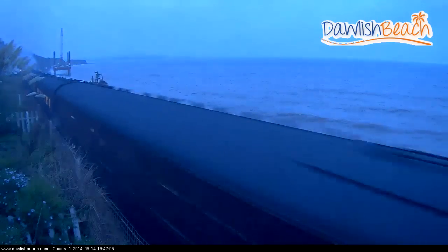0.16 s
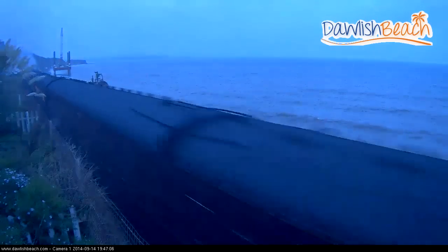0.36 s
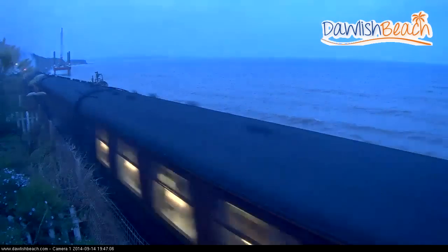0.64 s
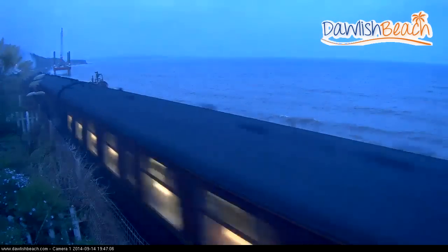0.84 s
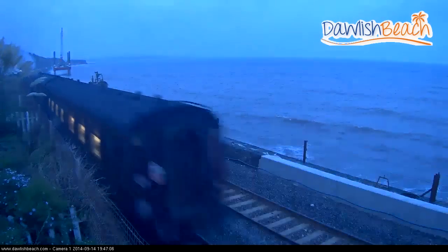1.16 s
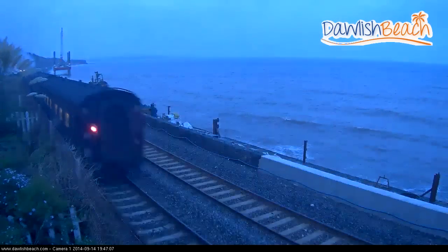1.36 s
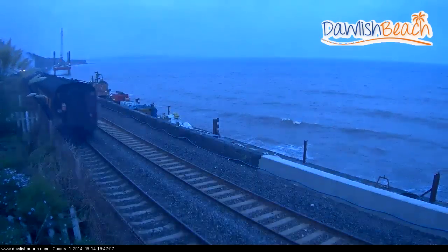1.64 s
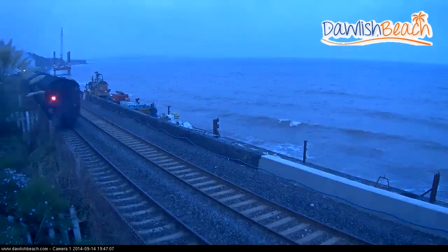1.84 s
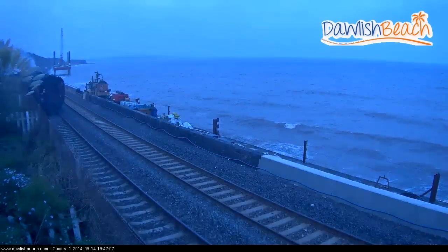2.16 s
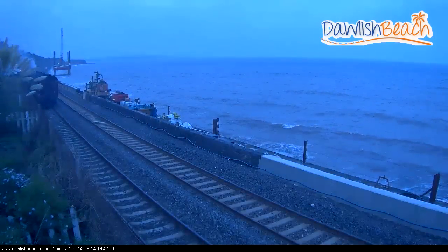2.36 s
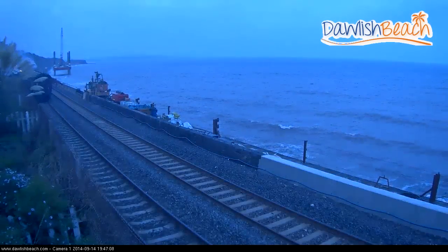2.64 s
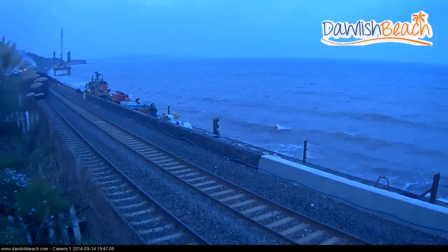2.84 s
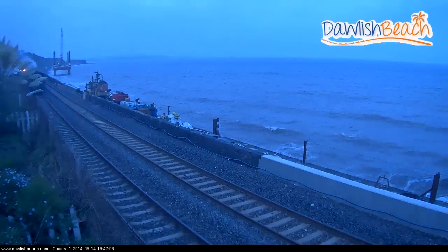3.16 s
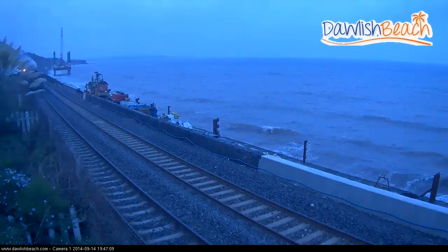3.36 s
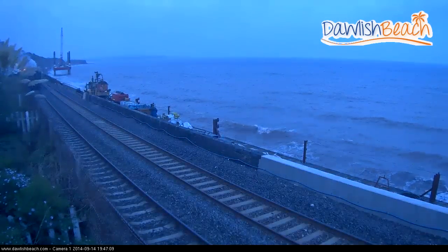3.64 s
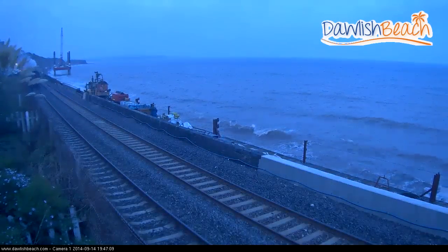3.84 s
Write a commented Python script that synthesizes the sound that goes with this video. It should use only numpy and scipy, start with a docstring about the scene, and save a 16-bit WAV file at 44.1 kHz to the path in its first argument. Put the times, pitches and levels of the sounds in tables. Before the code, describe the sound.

Train coaches roar past very close, distorted and rattling, then recede into a low fading roll.

```python
"""The last coaches of a train roll past a cheap outdoor microphone and draw away along a sea wall.
At first shaped noise roars, rumbles and rattles, with short noise ticks and singing rails (fuzzy tones).
The roar overloads the input stage lopsidedly. After about a second the train sinks away.
Then short dull rings sound in the fading roll, while a faint whine fades and noise makes gusts of wind.
Near the end the soft hiss of the surf, also shaped noise, swells again."""
import sys
import numpy as np
from scipy import signal
from scipy.io import wavfile
from scipy.ndimage import uniform_filter1d

SR = 44100
rng = np.random.default_rng(int(sys.argv[2]) if len(sys.argv) > 2 else 0)


def to_wav(s):
    """Save 16-bit WAV."""
    ch = np.atleast_2d(s).T  # columns
    pcm = np.round(np.clip(ch, -1, 1) * 32767)  # PCM
    wavfile.write(sys.argv[1], SR, pcm.astype(np.int16))


def linear_from_db(decibels):
    """Turn decibels (scalar or array-like) into linear amplitude factors; 0 gives 1."""
    return 10 ** (np.asarray(decibels, float) / 20)


N = 176400  # samples, 4 s

# Colours give only the balance between pitches; each sound's level is set apart from its colour.
# hiss of the surf: t/s, level/dB
SURF_LEVEL = [(1.5, -58.5), (2.25, -63.5), (3.0, -68), (3.5, -68), (3.75, -63.5), (4.0, -62.5)]
# colour of the surf: f/Hz, level/dB per Hz
SURF_SPECTRUM = [(1760, -23), (3000, -2.5), (4750, -0.5), (5410, -4.5), (6510, -5), (8000, -10.5),
                 (10100, -9.5), (13200, -16.5), (15500, -28)]
# wind on the microphone housing: t/s, level/dB
WIND_LEVEL = [(0, -40), (1.3, -43), (1.5, -54), (1.8, -46), (1.95, -41), (2.3, -42), (2.55, -49),
              (2.85, -40), (3.2, -48.5), (3.7, -52), (3.8, -43), (4, -48)]
# high whine of the leaving train: f/Hz, width/Hz, level at 1.5 s/dB, fall/dB per s
WHINE_BANDS = [(8630, 650, -69.5, 10), (6650, 300, -81.5, 0.5), (11700, 300, -85, 0.5)]
# deep rumble of the coach bodies alongside, then of the sea: t/s, level/dB
RUMBLE_LEVEL = [(0, -16.5), (.6, -20.5), (1.15, -25.5), (1.36, -28.5), (1.43, -48), (2, -49), (2.6, -42),
                (3.3, -46), (4, -42.5)]
# colour of the rumble: f/Hz, level/dB per Hz
RUMBLE_SPECTRUM = [(30, -7.5), (60, -7.5), (130, -3), (200, 1.5), (380, 2.5), (520, 9.5), (1000, -41),
                   (16000, -120)]
# rattle of the coaches: t/s, level/dB
RATTLE_LEVEL = [(0, -26.5), (.2, -26), (.4, -24), (.47, -33), (.6, -31), (.8, -30.5), (.97, -26),
                (1.05, -31), (1.13, -32), (1.25, -39), (1.4, -45.5), (1.6, -53), (2.0, -55), (2.6, -53),
                (4, -77)]
# colour of the rattle: f/Hz, level/dB per Hz
RATTLE_SPECTRUM = [(800, -38), (1500, 9.5), (3000, -9.5), (6000, -20), (11000, -29), (16000, -41)]
# sharp ticks of metal on metal: t/s, level at the start of the decay/dB
TICK_HITS = [(0.0653, -28), (0.0902, -30), (0.150, -26), (0.1855, -29), (0.214, -33), (0.301, -32),
             (0.321, -30), (0.372, -37), (0.398, -29), (0.4604, -38), (0.526, -32), (0.6045, -32),
             (0.668, -31), (0.7195, -28), (0.778, -40), (0.853, -32), (0.984, -32), (1.054, -37),
             (1.089, -33), (1.168, -41), (1.222, -42.5), (1.249, -50), (1.274, -45), (1.331, -46)]
# short dull rings near 700 Hz within the fading roll:
# t/s, level before rise, decay and doubling/dB, ring f/Hz
DULL_RINGS = [(1.868, -11, 686), (1.943, -17, 680), (1.978, -17, 730), (1.996, -16, 705), (2.066, -18, 720),
              (2.186, -16.5, 710), (2.612, -25, 730), (2.665, -19, 737), (2.718, -19, 770),
              (3.397, -24, 700)]
# rolling noise before the overload: t/s, level/dB, tilt/dB per doubling of (1 + f/700 Hz), hump f/Hz
PASSING = [(0, -10, -3, 764), (.15, -10, 4.5, 743), (.3, -10, 10, 724), (.45, -9.5, 13, 646),
           (.6, -10.5, 8.5, 720), (.75, -10, 10.5, 642), (.87, -11, 8.5, 750), (1.0, -11, 13, 628),
           (1.119, -10.5, -6.5, 724), (1.25, -15, -2.5, 710), (1.4, -20, 3, 624), (1.65, -20.5, -0.5, 663),
           (1.95, -26, 1, 653), (2.3, -28.5, 0, 668), (2.55, -30.5, -1.5, 708), (3.0, -31, 0, 670),
           (3.3, -31, -0.5, 684), (3.5, -32.5, 3, 667), (3.65, -31, 1.5, 652), (3.85, -30, 3, 649),
           (4.0, -33, 5.5, 686)]
# colour of wheels and rails with the hump at 700 Hz: f/Hz, level/dB per Hz
ROLLING_SPECTRUM = [(20, -40), (100, -26), (200, -19.5), (290, -22), (340, -13.5), (400, -14.5),
                    (470, -5.5), (600, -1.5), (730, 0), (850, -3.5), (1000, -11.5), (1200, -16.5),
                    (1400, -16.5), (1600, -36), (2100, -30), (2700, -42.5), (4000, -55), (16000, -78)]
# three resonances of wheel and rail, two gliding and one steady, before their lift: width/Hz, level/dB
# (level against the rolling noise)
RAIL_RESONANCES = [(56, -21), (35, -9), (47, -33.5)]
# singing of the rails, added to the resonance levels: t/s, then the lift of each of the three/dB
SINGING_LIFT = [(0, 8.5, 2, 10), (.3, 7.5, 2.5, 7), (.55, 1, 2.5, 2), (.8, 3, -1.5, -4), (1.0, 8.5, 2, 5),
                (1.2, -1, 3, -3), (1.4, -4, -6, -4.5), (2.0, -7, 1, 3), (2.15, 5, 1, 6), (2.3, -3, 5, 11),
                (2.5, 3, 0, 3), (2.62, 7.5, -2.5, 8), (2.78, -3, 0, 1), (2.93, -2, 0, 6),
                (3.05, -1.5, -9, 2), (4, -7, -3, -4)]
# pitch of the gliding resonances as the bogies go by: t/s, upper f/Hz, lower f/Hz
PITCH_GLIDE = [(0, 1419, 843), (.17, 1418, 813.6), (.25, 1313, 788), (.38, 1350, 790), (.46, 1350, 654),
               (.58, 1346, 637), (.66, 1363, 784), (0.859, 1334, 843), (0.931, 1290, 668),
               (1.059, 1280, 595), (1.139, 1312, 766), (1.25, 1335, 684), (1.4, 1298, 696),
               (2.0, 1373, 715), (4, 1375, 724)]


def evened(x):
    """Scales a sound to rms 1, so that its level can be set afterwards."""
    return x / np.sqrt(np.mean(x ** 2) + 1e-20)


def read(points, hz):
    """Reads a colour table at any pitch, along a logarithmic pitch axis."""
    f, value = np.transpose(points)
    return np.interp(np.log(hz + 1), np.log(f + 1), value)


def along(curve):
    """Turns a table of times and dB levels into a gain for every sample."""
    s, db = np.transpose(curve)
    return linear_from_db(np.interp(np.arange(N) / SR, s, db))


def drift(rate_hz):
    """Random wavering of rms 1: sines from a tenth of the rate up to the rate, slow ones strongest."""
    t = np.arange(N) / SR
    waves = [np.sin(2 * np.pi * (f * t + rng.random())) / np.sqrt(f)
             for f in np.geomspace(rate_hz / 10, rate_hz, 20)]
    return evened(sum(waves))


def noise(field_db, patchy_db, size=1024):
    """Noise of rms 1 from random short spectra coloured by field_db(Hz, s), with drifting patches."""
    frames = N * 4 // size + 5
    hz = np.fft.rfftfreq(size, 1 / SR)[:, None]
    a, b, patches = rng.standard_normal((frames, len(hz), 3)).T
    patches = uniform_filter1d(patches, size=8, axis=0)
    patches = evened(uniform_filter1d(patches, size=10, axis=1))
    frame_s = np.arange(frames) * size / 4 / SR
    shape = linear_from_db(field_db(hz, frame_s) + 0 * a)
    shape = shape / np.sqrt((shape ** 2).mean(0))  # equally strong frames, before the patches
    spectra = (a + 1j * b) * shape * linear_from_db(patchy_db * patches)
    sound = signal.istft(spectra, nperseg=size, noverlap=size * 3 // 4)[1]
    return evened(sound[:N])


def fuzzy_tone(hz, width):
    """Noise of rms 1 through a doubled narrow resonance, whose pitch may stay or glide."""
    turn = np.exp(2j * np.pi * np.cumsum(hz * np.ones(N)) / SR)
    r = np.exp(-np.pi * width / SR)
    # filter around zero pitch, then turn the result up to the wanted pitch
    low = signal.lfilter([1], np.convolve([1, -r], [1, -r]), rng.standard_normal(N) / turn)
    return evened((turn * low).real)


def add(mix, s, sound):
    """Mixes a sound in at time s, cut off at the end of the mix."""
    part = mix[round(s * SR):][:len(sound)]
    part += sound[:len(part)]


def surf():
    """Smooth wide hiss of shaped noise, swelling as a wave runs in."""
    hiss = noise(lambda hz, t: read(SURF_SPECTRUM, hz), patchy_db=-0.2, size=512)
    return along(SURF_LEVEL) * linear_from_db(0.27 * drift(8.9)) * hiss


def wind():
    """Lumpy low buffeting of air on the housing, with ever less power above a low corner."""
    corner_hz, slope_db = 49, 15  # slope: dB per doubling of (1 + (f/corner)^2)
    low = noise(lambda hz, t: -slope_db * np.log2(1 + (hz / corner_hz) ** 2), patchy_db=1.2, size=4096)
    return along(WIND_LEVEL) * linear_from_db(1.7 * drift(1.5)) * low


def whine():
    """Broad high bands of resonant noise, fading steadily as the train leaves."""
    t = np.arange(N) / SR - 1.5
    return sum(linear_from_db(db - fall * t) * fuzzy_tone(hz, width) for hz, width, db, fall in WHINE_BANDS)


def rumble():
    """Low noise of the coach bodies that drops to the wash of the sea once the last coach has gone by."""
    low = noise(lambda hz, t: read(RUMBLE_SPECTRUM, hz), patchy_db=2.65, size=2048)
    return along(RUMBLE_LEVEL) * low


def rattle():
    """Bright clatter of the coaches: noise whose level flickers in quick bursts."""
    clatter = noise(lambda hz, t: read(RATTLE_SPECTRUM, hz), patchy_db=2.5, size=256)
    return along(RATTLE_LEVEL) * linear_from_db(0.5 * drift(62.5)) * clatter


def ticks():
    """Bright ticks from the couplings: puffs of band-limited noise that die away at once."""
    t60_s, low_hz, high_hz = 0.018, 1500, 4000  # t60: time to fall by 60 dB
    out, t = np.zeros(N), np.arange(3000) / SR
    band = signal.butter(1, [low_hz, high_hz], "band", fs=SR)
    puffs = signal.lfilter(*band, rng.standard_normal((len(TICK_HITS), len(t))))
    for (s, db), puff in zip(TICK_HITS, puffs):
        add(out, s, linear_from_db(db - 60 * t / t60_s) * evened(puff))
    return out


def dull_rings():
    """Short dull rings in the fading roll: sines that rise softly and die away quickly."""
    rise_s, t60_s = 0.003, 0.031  # t60: time to fall by 60 dB
    out, t = np.zeros(N), np.arange(3000) / SR
    for s, db, hz in DULL_RINGS:
        envelope = linear_from_db(db - 60 * t / t60_s) * (1 - np.exp(-t / rise_s))
        add(out, s, envelope * 2 * np.sin(2 * np.pi * hz * t))
    return out


def rail_singing():
    """Wheel and rail resonances: two fuzzy tones with gliding pitch and one steady one."""
    steady_hz = 1980
    at, *lifts = np.transpose(SINGING_LIFT)
    when, *pitches = np.transpose(PITCH_GLIDE)
    pitches.append(steady_hz + 0 * when)
    out = np.zeros(N)
    for lift, pitch, (width, db) in zip(lifts, pitches, RAIL_RESONANCES):
        hz = np.interp(np.arange(N) / SR, when, pitch)
        out += along(np.c_[at, lift]) * linear_from_db(db) * fuzzy_tone(hz, width)
    return out


def rolling():
    """Wheel and rail roar: noise whose hump wanders from bogie to bogie and whose brightness shifts."""
    hump_hz = 700  # hump of the colour table
    s, db, tilt, hump = np.transpose(PASSING)

    def colour(hz, t):
        """Stretches the colour so that its hump moves, then tilts it."""
        base = read(ROLLING_SPECTRUM, hz * hump_hz / np.interp(t, s, hump))
        return base + np.interp(t, s, tilt) * np.log2(1 + np.minimum(hz / hump_hz, 4))

    roar = linear_from_db(0.33 * drift(20)) * noise(colour, patchy_db=0.73)
    return along(np.c_[s, db]) * (roar + rail_singing())


def scene():
    """Adds up all sources at one microphone."""
    background = surf() + wind() + whine()
    train = rumble() + rattle() + ticks() + dull_rings() + rolling()
    return (background + train)[None]


def top_cut(x):
    """Nothing passes above the cut-off."""
    return signal.sosfilt(signal.butter(12, 15610, fs=SR, output="sos"), x)


def record(dry):
    """An off-centre input stage flattens upper half-waves first; a coupling capacitor removes the offset."""
    bias, clean_share = 0.59, 0.08
    ceiling, coupling_hz = 0.34, 85  # ceiling: size of the bending curve
    gain = ceiling * (1 - np.tanh(bias) ** 2)  # quiet sound passes the curve at its own level
    bent = ceiling * (np.tanh(dry / gain + bias) - np.tanh(bias))
    overloaded = bent + clean_share * dry
    coupled = signal.lfilter(*signal.butter(1, coupling_hz, "high", fs=SR), overloaded)
    return top_cut(coupled)


dry = scene()
out = record(dry)
to_wav(out)
```